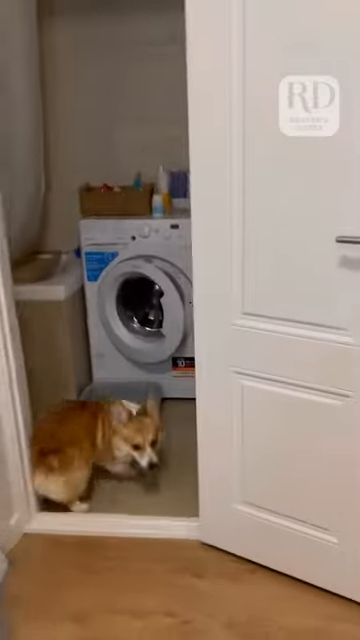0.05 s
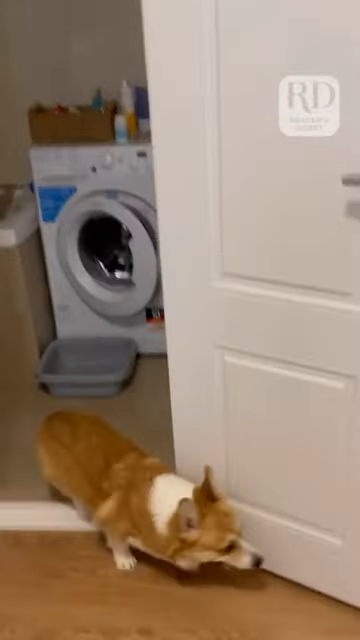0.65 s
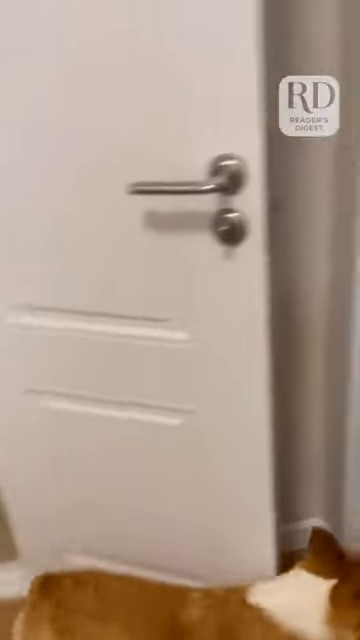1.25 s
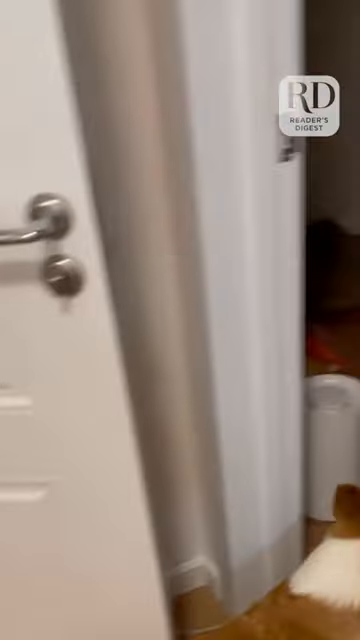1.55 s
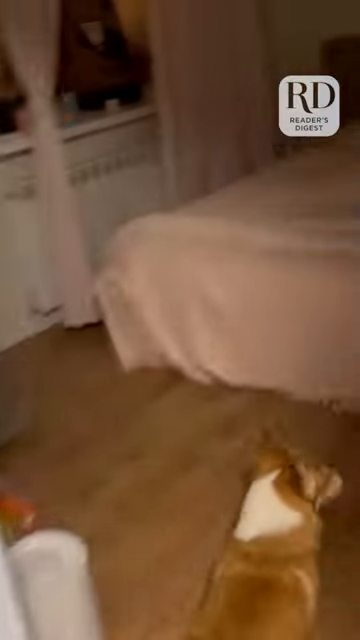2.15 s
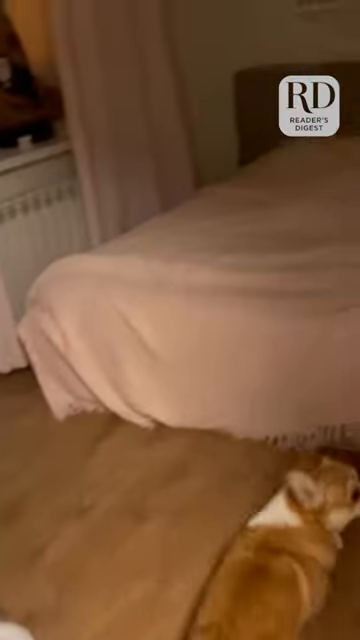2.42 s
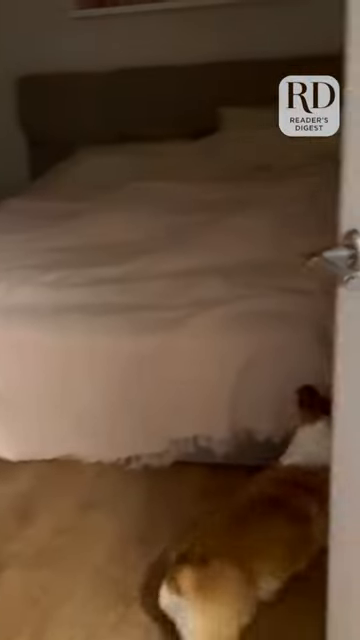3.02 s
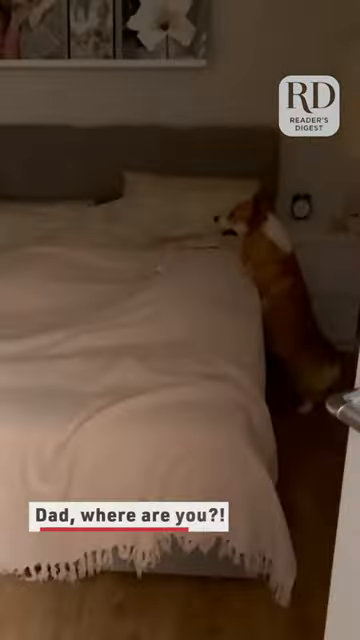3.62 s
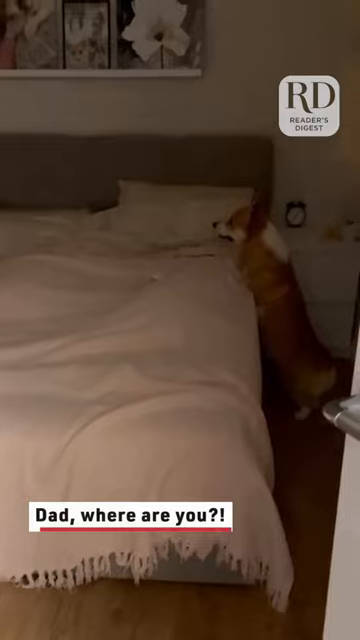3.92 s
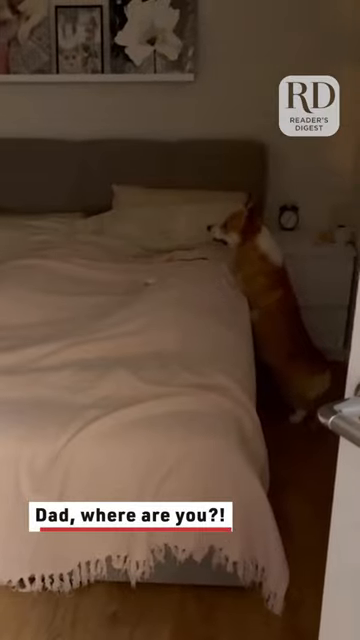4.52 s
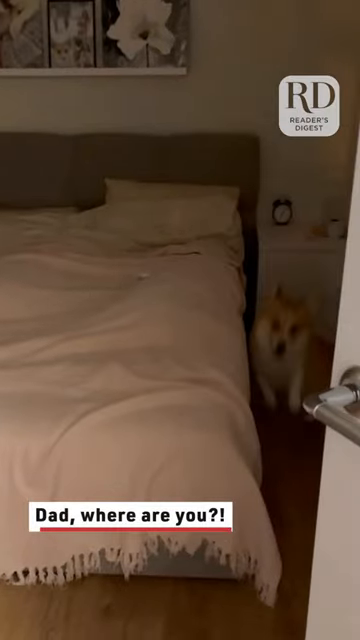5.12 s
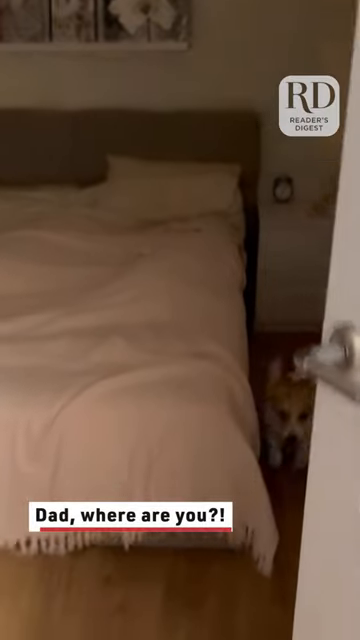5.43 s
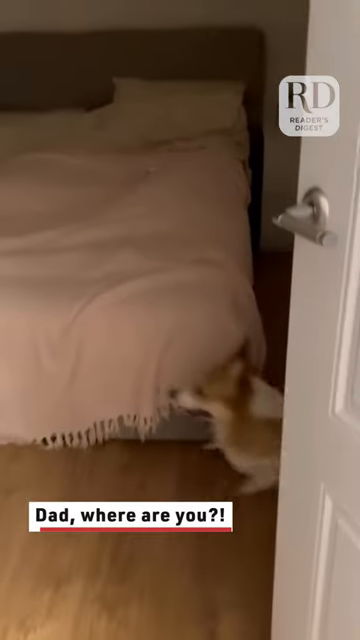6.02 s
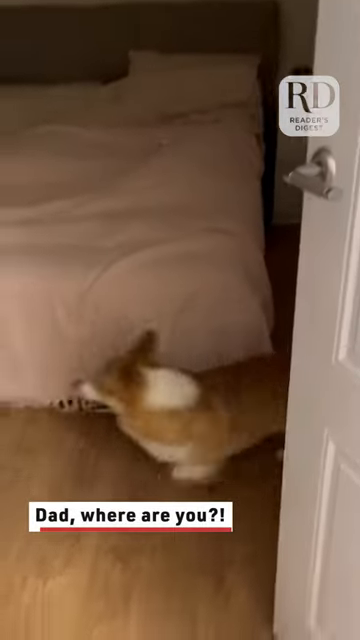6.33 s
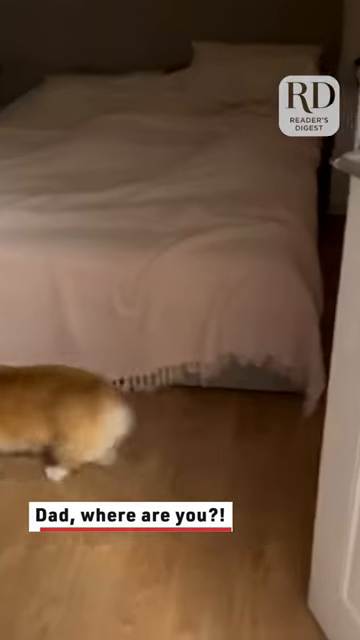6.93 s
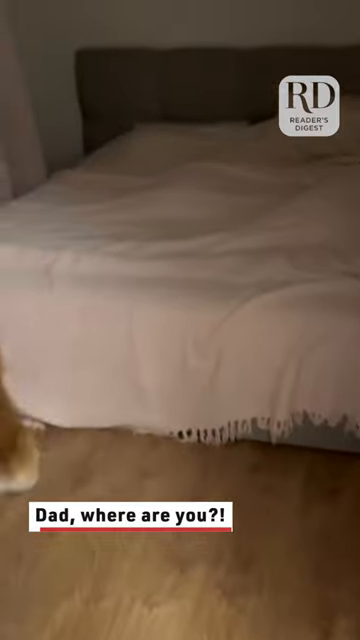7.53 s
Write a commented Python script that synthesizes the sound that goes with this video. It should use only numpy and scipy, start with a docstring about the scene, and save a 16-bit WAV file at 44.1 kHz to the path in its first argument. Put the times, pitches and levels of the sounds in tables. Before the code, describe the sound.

A small dog's claws click on a hard floor as it trots through a quiet room, pauses briefly, then trots back closer and louder.

```python
"""In a bedroom with a laminate floor, a small dog trots in, rears up against the bed and waits,
then drops down and trots back past the listener. Its hard claws tick, snap and skid on the boards,
its soft pads knock and rub, its fur brushes, and heavy landings shake the floor.
The small room rings briefly after each step, over a low rumble and a faint appliance hum."""
import sys
import numpy as np
from scipy import signal
from scipy.fft import rfft, irfft, next_fast_len
from scipy.io import wavfile
from scipy.ndimage import map_coordinates

SR = 44100
rng = np.random.default_rng(int(sys.argv[2]) if len(sys.argv) > 2 else 0)


def wav_record(signal):
    """Record a signal, one row per channel, as 16-bit PCM in the file named by sys.argv[1]."""
    frames = np.transpose(np.atleast_2d(signal))
    bounded = np.clip(frames, -1, 1)
    # unit amplitude maps onto the largest positive 16-bit level
    quanta = np.round(bounded * 32767).astype(np.int16)
    wavfile.write(sys.argv[1], SR, quanta)


N = 342216
TIME = np.arange(N) / SR


def amp(db):
    """Turn decibels into a number to multiply by."""
    return 10 ** (np.asarray(db) / 20)


def unit(x):
    """Scale to an average strength (rms) of 1."""
    return x / np.sqrt(np.mean(x ** 2) + 1e-20)


def match_energy(x, model):
    """Give each row of x as much energy as the whole model."""
    return x * np.linalg.norm(model) / np.linalg.norm(x, axis=1, keepdims=True)


def peak(hz, centre, width):
    """A hill of height 1 around the pitch at which something rings."""
    return 1 / (1 + (2 * (hz - centre) / width) ** 2)


def along(points, hz):
    """Read between (frequency, value) points, with octaves evenly spaced."""
    freqs, values = np.transpose(points)
    return np.interp(np.log(hz + 1), np.log(freqs), values)


def over_time(points):
    """Join (time, value) points into one value for each sample."""
    return np.interp(TIME, *np.transpose(points))


def wobble(knots, size):
    """A smooth random curve through so many points."""
    return map_coordinates(rng.standard_normal(4096), [np.linspace(0, knots, size)], mode="wrap")


def add(track, s, sound):
    """Mix a sound into a track at s seconds."""
    start = max(round(s * SR), 0)
    part = track[:, start:start + sound.shape[1]]
    part += sound[:, :part.shape[1]]


def hiss(size):
    """White noise in two rows: mid (what both ears share) and side (how they differ)."""
    return rng.standard_normal((2, size))


def coloured(x, colour_db):
    """Give x a colour: some frequencies louder, some softer. White noise keeps its power."""
    n = x.shape[-1]
    padded = 2 * next_fast_len(n // 2 + 2048)
    gain = unit(amp(colour_db(np.fft.rfftfreq(padded, 1 / SR))))
    # folding the cepstrum makes the filter ring after a hit, never before it
    cepstrum = irfft(np.log(np.maximum(gain, 1e-6)))
    cepstrum[1:padded // 2] *= 2
    cepstrum[padded // 2 + 1:] = 0
    return irfft(rfft(x, padded) * np.exp(rfft(cepstrum)), padded)[..., :n]


def noise(colour):
    """Steady noise coloured by a table."""
    return coloured(hiss(N), lambda hz: along(colour, hz))


def burst(shape, centre_hz, width_hz):
    """A puff of noise around one pitch, its loudness following the shape."""
    puff = coloured(hiss(len(shape)) * shape, lambda hz: 20 * np.log10(peak(hz, centre_hz, width_hz)))
    return match_energy(puff, shape)


# how loud the low rumble is: t/s, level/dB
RUMBLE_LEVEL = [(0, -59.5), (.9, -58.5), (2.1, -62), (3.5, -63.5), (4.35, -76), (4.9, -66.5), (5.6, -63),
                (7.25, -63.5), (7.37, -42), (7.76, -67)]
# colour of the rumble: f/Hz, level/dB
RUMBLE_COLOUR = [(15, -27), (30, -28), (39, -36), (46, 9), (53, -4), (80, -16.5), (200, -46), (800, -81)]
# colour of the still air: f/Hz, level/dB
AIR_COLOUR = [(30, 3.5), (98, 7), (120, -17.5), (200, 16), (450, 0.5), (800, -12), (1300, -21.5),
              (3000, -35.5), (8000, -29.5), (14000, -41)]

def room_tone(sway_db=2, air_db=-77):
    """A low rumble sways in loudness over the steady hush of the room's air."""
    rumble = amp(over_time(RUMBLE_LEVEL) + sway_db * wobble(35, N)) * noise(RUMBLE_COLOUR)
    return rumble + amp(air_db) * noise(AIR_COLOUR)


# tones of a household appliance: f/Hz, level/dB
HUM_TONES = [(48, -77), (97, -89.5), (225, -75), (801, -92)]

def hum(waver_radians=0.5, swell_db=3):
    """An appliance's steady tones waver a little as the listener moves through the rooms."""
    mid = np.zeros(N)
    for hz, db in HUM_TONES:
        level = amp(db + swell_db * wobble(32, N))
        mid += level * np.sin(2 * np.pi * hz * TIME + waver_radians * wobble(28, N))
    return np.sqrt(2) * np.array([mid, np.zeros(N)])


# broad colour of a knock on the boards: f/Hz, level/dB
KNOCK_COLOUR = [(120, -17), (260, -1.5), (430, -3), (620, -1.5), (850, -5.5), (1300, -14), (2200, -13.5),
                (5000, -34), (10000, -51.5)]
# the boards' own notes: f/Hz, width/Hz, boost/dB
BOARD_NOTES = [(330, 29, -1), (414, 25, 7), (523, 19, 0), (597, 7.2, 7.5)]

def board_colour(hz):
    """The boards answer over a broad range, with their own notes on top."""
    return along(KNOCK_COLOUR, hz) + sum(db * peak(hz, f, width) for f, width, db in BOARD_NOTES)


# how loudly the dog shuffles: t/s, level/dB
SHUFFLE_LEVEL = [(0, -70.5), (.45, -66), (.63, -62.5), (.85, -59), (1.02, -67), (1.6, -66), (3.4, -71.5),
                 (3.9, -82.5), (4.5, -81), (4.9, -59.5), (7.1, -64.5), (7.76, -48)]
# colour of the floor's deep thud: f/Hz, level/dB
THUD_COLOUR = [(35, -26), (60, -8), (85, -2.5), (103, 1.5), (116, -3), (132, 0), (185, -6), (250, -12.5),
               (450, -22), (1500, -73)]

def shuffle(usual_db=-63, tremble_db=-64.5, tremble_growth=0.48):
    """The dog's shuffling rustles on the boards and makes the floor tremble."""
    level_db = over_time(SHUFFLE_LEVEL)
    rustle = amp(level_db) * coloured(hiss(N), board_colour)
    tremble = amp(tremble_db + tremble_growth * (level_db - usual_db)) * noise(THUD_COLOUR)
    return rustle + tremble


# how loudly the fur brushes: t/s, level/dB
FUR_LEVEL = [(0, -63.5), (.85, -60), (1.05, -60.5), (2.1, -65.5), (2.6, -69), (3.4, -66.5), (4.7, -59),
             (7.76, -61.5)]
# claws skidding on the boards: t/s, length/s, level/dB
SKIDS = [(0.5, 0.041, -51), (4.684, .014, -52.5), (5.14, 0.025, -61.5), (5.219, 0.055, -35),
         (5.39, 0.041, -62.5), (5.774, 0.12, -42.5), (5.919, .03, -48), (6.243, 0.022, -48.5),
         (7.298, 0.098, -38.5), (7.686, 0.11, -36.5)]

def scuff(level_db=-3, stand_s=3.58, leave_s=4.6, still_db=-25.5, bite_db_per_s=200, fade_db_per_s=610):
    """Brushing fur and dragging claws make uneven clumps of tiny grains."""
    # the fur goes almost silent while the dog stands against the bed
    standing = np.interp(TIME, [stand_s - 0.2, stand_s, leave_s, leave_s + 0.005], [0, 1, 1, 0])
    level = amp(over_time(FUR_LEVEL) + still_db * standing)
    for s, length, db in SKIDS:
        before = np.maximum(s - TIME, 0)
        after = np.maximum(TIME - s - length, 0)
        level = np.maximum(level, amp(db - bite_db_per_s * before - fade_db_per_s * after))
    grains = amp(3 * wobble(3500, N) + 3 * wobble(700, N) + 2.2 * wobble(170, N))
    return hiss(N) * unit(grains) * level * amp(level_db)


# how long the room rings: f/Hz, time to fade by 60 dB/s
ROOM_FADE = [(100, 0.29), (300, 0.27), (800, 0.25), (2000, 0.25), (5000, 0.23), (13000, 0.13)]

def room_tail(rise_s, colour_db=np.zeros_like):
    """Echoes off the walls build up, then each frequency dies away at its own speed."""
    hz, t, bands = signal.stft(coloured(hiss(SR // 3), colour_db), SR, nperseg=256)
    fade = amp(-60 * t / along(ROOM_FADE, hz)[:, None])
    tail = signal.istft(bands * fade, SR, nperseg=256)[1]
    return tail * (1 - np.exp(-np.arange(tail.shape[1]) / SR / rise_s))


GRAZE_S = 0.02  # a claw brushes the board this long before it ticks

def claw_tick(tick_db, room_db, colour_db, walls_db, attack_s=0.00015, life_s=0.0034,
              chatter_db=-2, graze_db=-9, ripple_db=6.5, low_cut_hz=1900):
    """One claw grazes the board and ticks, its neighbours chatter after it, and the room answers."""
    def echo_colour(hz):
        """Each spot in the room has its own dips and peaks."""
        return colour_db(hz) + walls_db(hz) + ripple_db * np.tanh(wobble(129.7, len(hz)))

    tail = room_tail(rise_s=0.0016, colour_db=echo_colour)
    size = tail.shape[1]
    t = np.arange(size) / SR
    first = (1 - np.exp(-t / attack_s)) * np.exp(-(t / life_s) ** 2)
    delays_s = rng.uniform(0.003, 0.014, (2, 1))
    neighbours = np.sum((t > delays_s) * np.exp(-np.abs(t - delays_s) / 0.0007), axis=0)
    contact = amp(tick_db) * first + amp(0.5 * (tick_db + room_db) + chatter_db) * neighbours
    # the tip catches and slips, breaking each touch into tiny clicks
    catches = amp(6 * wobble(700, size))
    # a claw is too small to give off much bass
    low_cut = signal.butter(2, low_cut_hz, "high", fs=SR, output="sos")
    tick = signal.sosfilt(low_cut, hiss(size) * contact * catches)
    # every claw has a few broad peaks of its own
    tick = coloured(tick, lambda hz: colour_db(hz) + 2 * wobble(22.5, len(hz)))
    tick = match_energy(tick, contact)
    # separate early echoes melt into a smooth tail
    echoes = amp(3 * np.exp(-t / 0.031) * (wobble(260, size) - 0.28))
    before = np.arange(-round(GRAZE_S * SR), 0) / SR
    graze = coloured(hiss(len(before)), colour_db) * amp(graze_db) * np.exp(before / 0.0056)
    return np.hstack([amp(room_db) * graze, amp(room_db) * tail * echoes + tick])


# colour of a claw on laminate: f/Hz, level/dB
CLAW_COLOUR = [(300, -18.5), (900, -11.5), (1500, -12.5), (2400, -10.5), (3500, -5.5), (4800, -7.5),
               (5500, -6.5), (6600, -8), (8000, -11.5), (8800, -16.5), (10500, -19.5), (12700, -10.5),
               (13400, -32), (14200, -36.5), (15500, -54)]
# claws landing, often several as a paw rolls: t/s, level/dB, brightness/(dB per octave), treble/dB
CLAW_HITS = [(.02, -69, 35, -2), (.08, -54, -0.5, 5), (.12, -58, -0.5, 14), (0.209, -52.5, 0.5, -3),
             (.325, -57, 21, -5), (.545, -46, -7, -2), (.709, -37.5, 3, -2), (0.7222, -37.5, 8.5, 4),
             (0.883, -53, 9, 10), (0.8895, -29.5, 4, -1.5), (.8955, -40.5, 4, 0), (1.086, -41.5, 1, -5),
             (1.095, -36, 2, -18), (1.109, -32, 0.5, -19), (1.131, -54, 9, -20), (1.317, -34.5, 4, -8),
             (1.408, -40, -1.5, -5), (1.493, -43, -4, -9), (1.505, -43.5, 4, -31), (1.669, -51, -4, 7),
             (1.674, -36.5, -0.5, 8), (1.681, -39.5, 11, -9), (1.6865, -38.5, -0.5, -31),
             (1.857, -52.5, -2, -9), (1.87, -37.5, 8.5, -8), (1.883, -38, 2, -2), (2.071, -48, 1, -2),
             (2.08, -41, 3.5, 4), (2.088, -39, 4, 1), (2.297, -48, -3, 11), (2.3151, -34.5, 3.5, 2),
             (2.537, -46.5, 4, -3), (2.56, -47.5, 2, -9), (2.574, -48.5, 1.5, -9), (2.725, -56.5, -1, 5),
             (2.782, -58, 1, -3), (2.8, -42.5, 5.5, -5), (2.812, -40.5, 6.5, 4), (2.818, -54, 1, 3),
             (3.0553, -51, 3, -20), (3.0675, -41, 6, -34), (3.254, -51, 3, -10), (3.2676, -43, 4.5, -27),
             (3.286, -37.5, 3, -5), (3.379, -47, 1.5, -7), (3.414, -31, 1.5, -4), (3.421, -35.5, 10, -7),
             (4.675, -37.5, 3.5, -16), (4.684, -40.5, 0, 0), (4.7599, -36.5, 3.5, -23),
             (4.767, -27.5, 4, -7.5), (4.773, -56, -1, 10), (5.001, -35, 0.5, -14), (5.008, -43, 20, 20),
             (5.201, -25.5, 3, -2.5), (5.214, -32, 26, -7), (5.2243, -24.5, 6.5, -5), (5.24, -30, -1, 37),
             (5.3625, -36, 3.5, -2), (5.4745, -53, 6, -4), (5.5092, -39.5, 2, -5), (5.557, -48, 5, -6),
             (5.594, -36.5, 5, -6), (5.6634, -38, -4.5, -31), (5.698, -43, -0.5, 6), (5.709, -44, -4, -10),
             (5.75, -50, -7, 6), (5.778, -49, -15, -5), (5.81, -35.5, 5, -2), (5.8189, -30.5, 6.5, -11),
             (5.838, -33, 4, -0.5), (5.947, -37, 10, -16), (5.961, -38.5, -3.5, 1), (5.979, -36, 5, -4),
             (5.988, -35.5, -1.5, 2), (6.07, -39, 9, -8), (6.078, -41.5, -1.5, -8), (6.137, -38.5, 5, -22),
             (6.145, -39, 3.5, -1), (6.246, -33, 5.5, -3), (6.251, -34, -2.5, 7), (6.26, -27, 3.5, 0),
             (6.417, -43.5, 2, -11), (6.431, -40, 2.5, -22), (6.464, -40.5, 1.5, -18), (6.48, -50, 2, -24),
             (6.58, -30, 0, 0), (6.586, -32, 10, 1), (6.6102, -37.5, 3, -18), (6.6208, -32.5, -1, -15),
             (6.6535, -46, 0, 9), (6.6589, -28.5, -1, -4), (6.7358, -38.5, 7, -5), (6.751, -44, 1, -14),
             (6.884, -47, -2, 1), (6.893, -35, 4, -6), (6.956, -30, -7, -1), (6.963, -32.5, -1.5, -3.5),
             (7.0696, -37.5, 3.5, -5.5), (7.092, -40, 7.5, -9), (7.19, -22.5, 2.5, -9), (7.192, -27, -2, 2),
             (7.211, -23.5, 5, 2), (7.299, -32, -5, -2), (7.3045, -17, 0.5, -8), (7.309, -21.5, 5.5, -10),
             (7.317, -25, 12, -4), (7.463, -36, 1.5, -3), (7.485, -24.5, 9, -5.5), (7.649, -38.5, -10, 18),
             (7.6645, -21.5, 3, -7.5), (7.6716, -18.5, 8, -36), (7.677, -39, -3, -20),
             (7.7163, -27, 15, -27), (7.749, -26.5, 8, -26)]
# each step rings its own way, as other claws meet another board:
# t/s, lower ring f/Hz, upper ring f/Hz, ring boost/dB, dip f/Hz
STEP_RINGS = [(.71, 3970, 5660, 2, 5100), (.89, 2970, 6500, 4.5, 4560), (1.1, 4150, 5490, 2.5, 2540),
              (1.315, 3930, 6200, 1.5, 6760), (1.41, 4100, 5600, 4, 4950), (1.5, 4030, 5800, 7.5, 2740),
              (1.68, 4120, 5730, 9, 4760), (1.87, 3450, 5940, 8, 4870), (2.08, 4340, 5170, 4.5, 3340),
              (2.31, 4360, 6310, 7, 2900), (2.55, 3980, 6700, 2.5, 3040), (2.81, 3920, 5360, 9.5, 5030),
              (3.06, 3950, 6700, 10, 6800), (3.28, 3900, 7100, 4, 3040), (3.414, 3880, 7590, 3, 6890),
              (4.68, 4160, 5310, 2, 4820), (4.76, 3370, 7940, 3.5, 4730), (5.0, 3300, 6200, 3, 2220),
              (5.22, 3530, 6200, 3.5, 4600), (5.363, 3470, 6500, 12.5, 2900), (5.51, 3670, 6500, 5, 6200),
              (5.594, 3340, 5980, 5, 4700), (5.66, 3480, 6110, 8, 7560), (5.82, 3600, 5130, 5, 4850),
              (5.96, 3550, 5800, 3, 5140), (6.07, 4440, 5830, 4, 5080), (6.14, 3900, 5670, 7, 4750),
              (6.25, 4530, 6620, 0.5, 2530), (6.42, 2750, 6530, 2, 4170), (6.58, 3950, 6400, 0.5, 4900),
              (6.657, 2840, 6300, 4, 5370), (6.74, 3350, 5540, -1, 4360), (6.89, 3570, 5650, 0, 4160),
              (6.956, 3420, 7800, 4, 2540), (7.07, 3420, 5930, 1.5, 6300), (7.2, 3080, 6900, 2.5, 4120),
              (7.31, 3800, 5430, 4, 7740), (7.485, 3480, 6500, 4, 7730), (7.67, 3480, 5300, 5, 4660)]

def claws(walls_db=6.5, drift_radians_per_s=2.55, ring_width_hz=330, dip_db=7, dip_width_hz=300,
          usual_tick_db=-35.5, usual_room_db=-39.5, room_growth=0.78):
    """Ticks and scuffs share one colour; nearby walls add dips that drift from tick to tick."""
    grid = np.linspace(0, SR / 2, 4096)
    here, there = wobble(900, len(grid)), wobble(900, len(grid))
    treble = lambda hz: np.clip((hz - 7500) / 1500, 0, 1)
    scuff_walls = lambda hz: walls_db * np.tanh(np.interp(hz, grid, here))
    track = coloured(scuff(), lambda hz: along(CLAW_COLOUR, hz) + scuff_walls(hz) - 3 * treble(hz))
    for s, tick_db, bright_db, treble_db in CLAW_HITS:
        _, lower_hz, upper_hz, ring_db, dip_hz = min(STEP_RINGS, key=lambda row: abs(row[0] - s))

        def colour(hz):
            """This claw's brightness, with its step's two rings and one dip."""
            rings = ring_db * (peak(hz, lower_hz, ring_width_hz) + peak(hz, upper_hz, ring_width_hz))
            dip = dip_db * peak(hz, dip_hz, dip_width_hz)
            tilt = bright_db * np.log2(np.clip(hz, 1800, 7000) / 4500)
            return along(CLAW_COLOUR, hz) + rings - dip + tilt + treble_db * treble(hz)

        angle = drift_radians_per_s * s  # the pattern shifts as the dog moves
        pattern_db = walls_db * np.tanh(here * np.cos(angle) + there * np.sin(angle))
        # harder ticks are sharper: the room returns only part of their extra treble and level
        lost_db = 2 + 0.77 * max(treble_db, 0)
        walls = lambda hz: np.interp(hz, grid, pattern_db) - lost_db * treble(hz)
        room_db = usual_room_db + room_growth * (tick_db - usual_tick_db)
        add(track, s - GRAZE_S, claw_tick(tick_db, room_db, colour, walls))
    return track


# claw tips catching a board squarely: t/s, level/dB, f/Hz
SNAPS = [(.1205, -59, 8650), (0.8902, -36, 6300), (1.095, -47, 12100), (1.314, -46, 13400),
         (1.681, -40.5, 12200), (1.685, -39.5, 7700), (1.869, -49, 12800), (2.313, -48, 12900),
         (2.538, -68, 11500), (2.817, -40.5, 5940), (3.056, -70, 9200), (3.067, -46.5, 13000),
         (3.283, -39.5, 12100), (3.289, -42.5, 4690), (4.7594, -34.5, 3700), (5.2227, -30, 5650),
         (5.363, -46, 5470), (5.474, -57, 5660), (5.662, -43, 5640), (6.067, -40.5, 9300),
         (6.245, -37, 7600), (6.582, -41, 12500), (6.894, -32.5, 6100), (7.189, -30, 11100),
         (7.21, -44, 6600), (7.3008, -31.5, 12600), (7.4625, -61, 13000), (7.649, -38.5, 6430),
         (7.6649, -27, 5740)]

def snaps(boost_db=2, life_s=0.0047, width_hz=3000):
    """A claw tip rings with a dry snap, too briefly to fill the room."""
    track, t = np.zeros((2, N)), np.arange(SR // 50) / SR
    for s, db, pitch_hz in SNAPS:
        add(track, s, amp(db + boost_db) * burst(np.exp(-(t / life_s) ** 2), pitch_hz, width_hz))
    return track


def floor_knock(colour_db, rise_s, direct_gain=0.35, direct_life_s=0.019):
    """A short knock comes straight from the board, then rings through the room."""
    tail = room_tail(rise_s)
    t = np.arange(tail.shape[1]) / SR
    knock = tail + direct_gain * np.exp(-(t / direct_life_s) ** 2) * hiss(len(t))
    return match_energy(coloured(knock, colour_db), knock) / np.sqrt(2)


# pads landing on the boards: t/s, level/dB, board note f/Hz
PAD_STEPS = [(0.206, -60, 422), (.36, -59, 604), (0.5, -50, 295), (0.542, -53.5, 300), (.703, -44.5, 439),
             (.718, -51.5, 642), (.742, -56, 458), (.8, -51.5, 283), (0.888, -49, 553), (1.083, -48.5, 437),
             (1.108, -52, 660), (1.13, -50, 896), (1.313, -52.5, 490), (1.404, -53.5, 453),
             (1.486, -52.5, 407), (1.676, -51, 564), (1.867, -48.5, 403), (2.033, -53.5, 523),
             (2.075, -54.5, 424), (2.276, -50, 514), (2.31, -49, 578), (2.537, -58, 503), (2.716, -60, 554),
             (2.798, -58, 576), (3.059, -57.5, 550), (3.247, -52.5, 338), (3.412, -50.5, 737),
             (4.143, -56, 414), (4.659, -50.5, 374), (4.766, -45.5, 622), (4.829, -54.5, 360),
             (4.915, -57.5, 780), (4.95, -57, 640), (4.998, -51, 789), (5.199, -46.5, 980),
             (5.222, -41, 622), (5.25, -38.5, 605), (5.258, -42, 1150), (5.331, -70, 400),
             (5.364, -42.5, 352), (5.378, -51, 960), (5.507, -54, 590), (5.594, -52, 764), (5.66, -50, 584),
             (5.763, -55, 1140), (5.775, -53, 790), (5.816, -48, 620), (5.946, -52, 744), (5.975, -51, 705),
             (5.99, -64, 900), (6.068, -49, 795), (6.247, -47, 796), (6.257, -47, 610), (6.421, -51.5, 286),
             (6.576, -51, 504), (6.621, -58.5, 530), (6.656, -47.5, 493), (6.662, -45.5, 876),
             (6.734, -57, 490), (6.879, -49.5, 408), (6.955, -47.5, 760), (7.189, -41.5, 575),
             (7.23, -39, 582), (7.302, -43, 584), (7.484, -35.5, 621), (7.489, -38.5, 530),
             (7.499, -42, 428), (7.56, -39, 337), (7.665, -42.5, 575), (7.674, -46.5, 598),
             (7.714, -54, 560)]
# the floor along the dog's path: t/s, deepest note f/Hz, thud level above the pad's/dB
FLOOR_PATH = [(0.701, 165.6, 3), (1.1, 150, -4.5), (1.5, 139, 6), (2.501, 125, -10), (3.2, 107.8, 7),
              (4.2, 106.4, -10.5), (4.7, 116, 3), (5.2, 105, 1), (5.5, 103, 10), (6.3, 140, 2),
              (6.9, 135, -5.5), (7.25, 129, 7.5), (7.6, 134, -7)]

def paws(note_db=2.5, note_fade_s=0.1, note_growth=0.2, usual_db=-50, slap_s=0.002, knock_db=2.5):
    """Each pad slaps a board and knocks a hollow note out of it; the dog's weight adds a soft thud."""
    track, t = np.zeros((2, N)), np.arange(SR // 8) / SR
    note_shape = (1 - np.exp(-t / 0.0014)) * amp(-60 * t / note_fade_s)
    path_s, path_hz, path_db = np.transpose(FLOOR_PATH)
    for s, db, pitch_hz in PAD_STEPS:
        note = note_shape * np.sin(2 * np.pi * pitch_hz * t)
        # a heavier landing makes the board ring more clearly
        note *= amp(db + note_db + note_growth * (db - usual_db))
        add(track, s, np.array([note, np.zeros(len(t))]))
        slap = burst(np.exp(-t / slap_s), pitch_hz, width_hz=480)
        add(track, s, amp(db) * slap)
        hollow = lambda hz: board_colour(hz) + 8 * peak(hz, pitch_hz, width=120)
        add(track, s, amp(db + knock_db) * floor_knock(hollow, rise_s=0.016))
        thud_hz, thud_db = np.interp(s, path_s, path_hz), np.interp(s, path_s, path_db)
        thud = lambda hz: along(THUD_COLOUR, hz) + 7 * peak(hz, thud_hz, width=30)
        add(track, s, amp(db + thud_db) * floor_knock(thud, rise_s=0.0069))
    return track


# pads rubbing over sill and boards: middle t/s, half length/s, level/dB, f/Hz
RUBS = [(0.361, 0.027, -65, 1400), (0.55, 0.025, -53, 1950), (0.832, 0.027, -59.5, 1900),
        (0.877, 0.0035, -47.5, 1250), (4.148, 0.006, -69, 1900)]

def rubs(width_hz=1000, judder_db=4):
    """A pad judders over the wood in a short, dull swell."""
    track, t = np.zeros((2, N)), np.arange(-SR // 10, SR // 10) / SR
    for s, half_length, db, pitch_hz in RUBS:
        judder = unit(amp(judder_db * wobble(60, len(t))))
        swell = np.exp(-(t / half_length) ** 2) * judder
        add(track, s + t[0], amp(db) * burst(swell, pitch_hz, width_hz))
    return track


# heavy landings: t/s, level/dB, floor note f/Hz
LANDINGS = [(0.717, -46, 163), (.889, -52, 135), (5.225, -33, 72.6), (5.238, -41, 109), (5.347, -45, 75.4),
            (5.378, -38, 130), (7.307, -33, 54), (7.368, -29, 50), (7.5, -52, 41)]

def landings(fade_s=0.072, rise_s=0.016, boost_db=9):
    """A heavy landing sets the whole floor swinging a few times."""
    track, t = np.zeros((2, N)), np.arange(SR // 3) / SR
    shape = amp(-60 * t / fade_s) * (1 - np.exp(-t / rise_s))
    for s, db, floor_hz in LANDINGS:
        swing = shape * np.sin(2 * np.pi * floor_hz * t)
        add(track, s, amp(db + boost_db) * np.array([swing, swing]))
    return track


# how far left and right differ at each pitch, most of all around 9 kHz: f/Hz, side level/dB
STEREO_WIDTH = [(90, -28), (300, -8), (480, -7), (700, -2), (1250, -6.5), (1950, -19), (2800, 0.5),
                (4200, -1.5), (4800, 3), (5500, -9), (6300, -5.5), (7500, 1), (9200, 11.5), (11500, 7.5),
                (13000, -0.5)]

def scene():
    """Add up all the sounds, then turn mid and side into left and right."""
    mid, side = claws() + snaps() + paws() + rubs() + landings() + shuffle() + room_tone() + hum()
    padded = next_fast_len(N + 8192)
    width = amp(along(STEREO_WIDTH, np.fft.rfftfreq(padded, 1 / SR)))
    side = irfft(rfft(side, padded) * width, padded)[:N]
    return np.array([mid + side, mid - side])


def record(dry):
    """Cut away the very highest treble, above 14000 Hz."""
    return signal.sosfilt(signal.butter(20, 14000, fs=SR, output="sos"), dry)


dry = scene()
out = record(dry)
wav_record(out)
```